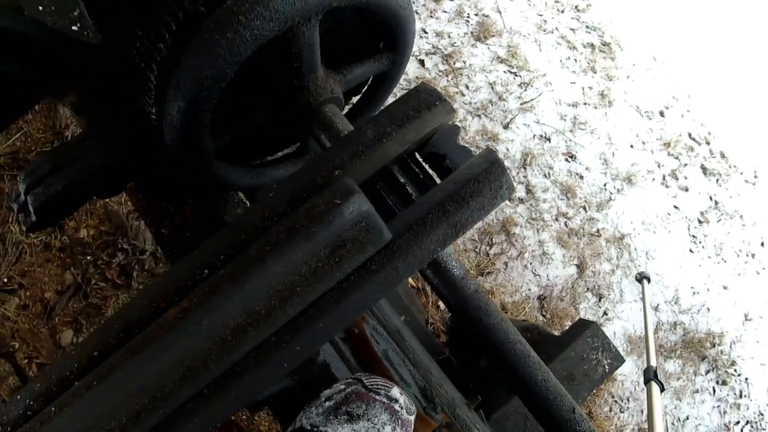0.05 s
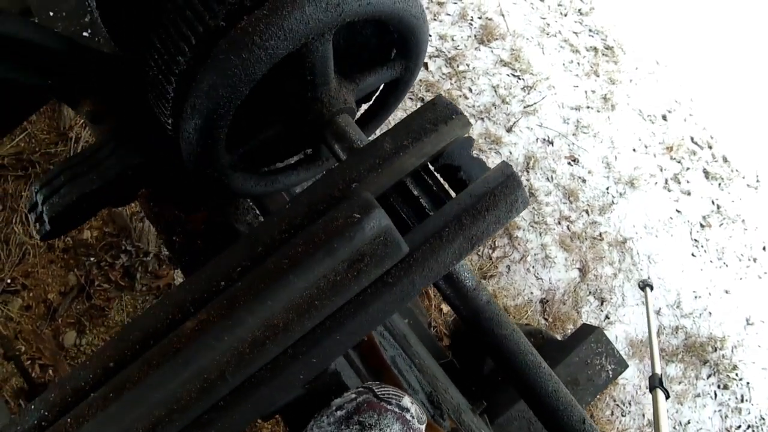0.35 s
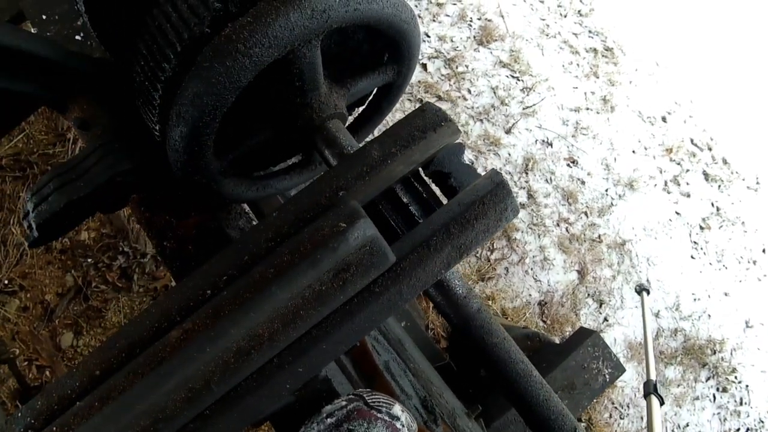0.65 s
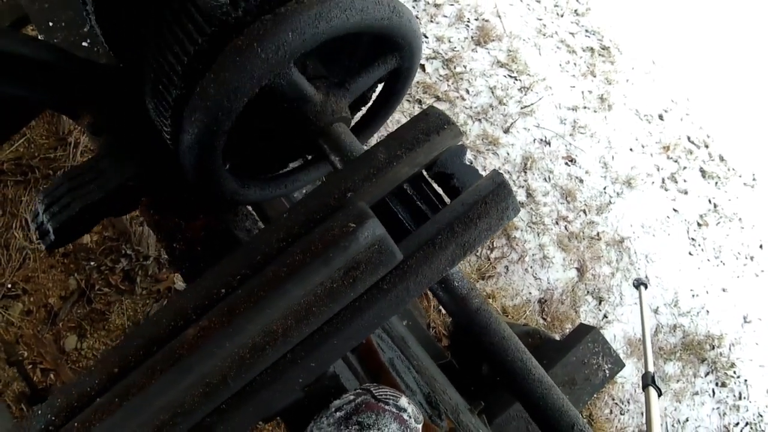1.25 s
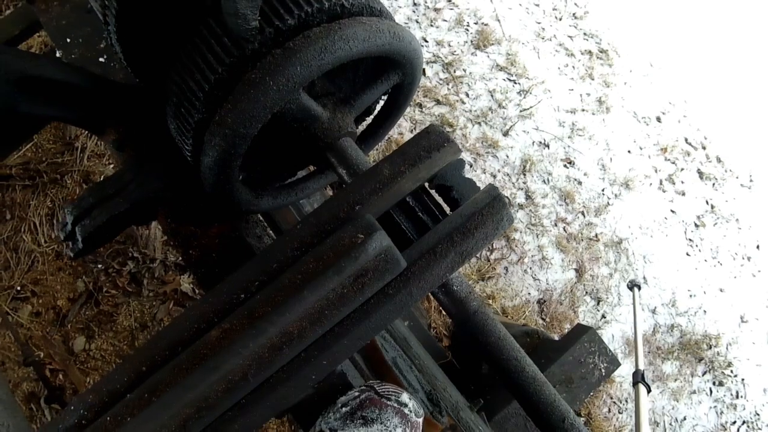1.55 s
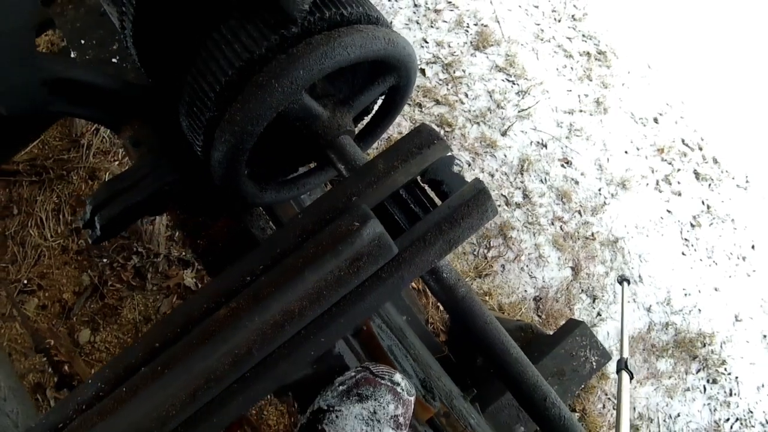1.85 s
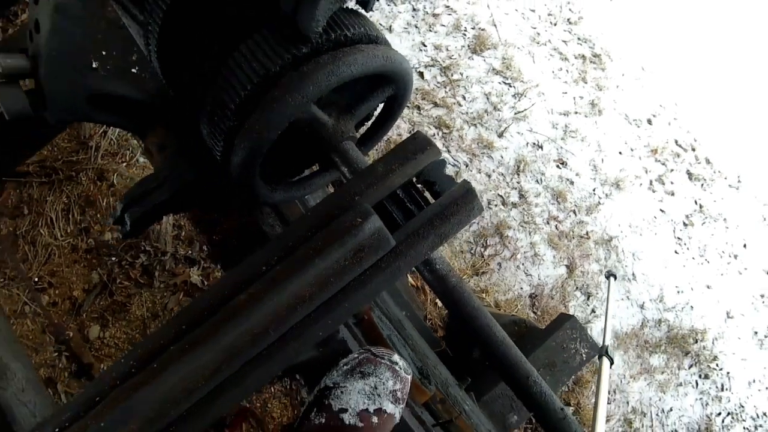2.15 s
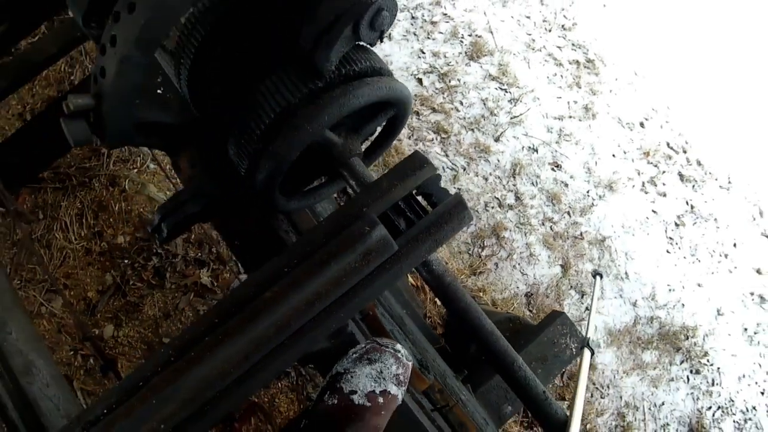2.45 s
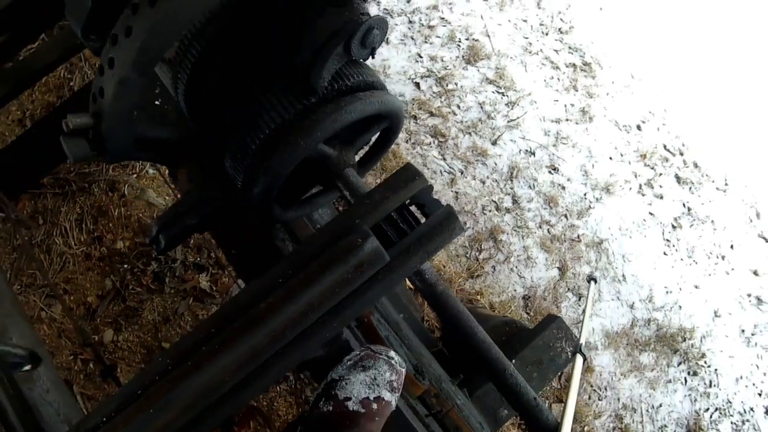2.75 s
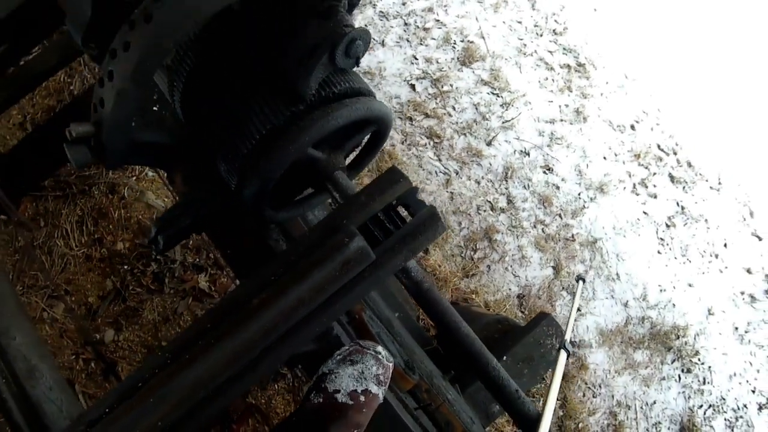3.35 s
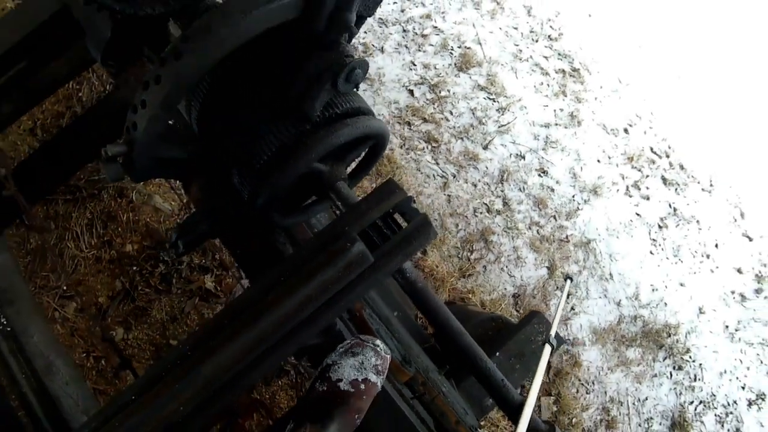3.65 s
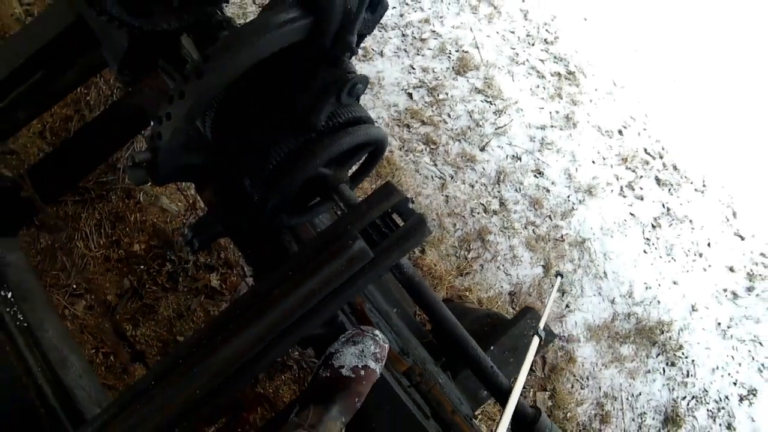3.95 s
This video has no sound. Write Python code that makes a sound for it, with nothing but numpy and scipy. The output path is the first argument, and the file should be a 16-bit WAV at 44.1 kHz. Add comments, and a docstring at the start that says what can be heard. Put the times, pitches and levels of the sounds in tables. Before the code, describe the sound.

Loose iron gearing clatters and lightly scrapes close by as a handwheel turns. Bright clinks cluster around 0.5 seconds, ending in a dull knock at 0.8. The clatter returns from 1 to 1.4 seconds, with more clinks near 1.75 and a knock at 2. After a lull, a faint rustle leads to two snaps around 3.6 seconds. A low rumble throbs softly throughout, in an open shed.

```python
"""An iron handwheel on an old sawmill carriage is worked back and forth, close by in an open shed,
over a low, throbbing rumble. First its loose gearing clatters and scrapes; on the way back an iron bar
clinks, with a short, bright ring from the gear, and the travel ends in a dull knock. The cycle is heard
a second time. After a lull come a soft rustle and two snaps, as of a catch. Each impact is a brief burst
of noise, and the struck parts ring on in their own damped modes."""
import sys
import numpy as np
from scipy import signal
from scipy.fft import rfft, irfft
from scipy.io import wavfile
from scipy.ndimage import uniform_filter1d

SR = 44100
rng = np.random.default_rng(int(sys.argv[2]) if len(sys.argv) > 2 else 0)


def transcribe(u):
    """Save the signal u as a 16-bit wav file named by the first command-line argument.

    u: samples, shape (n,) or (channels, n), limited to [-1, 1]; the rate is SR.
    q: integer samples, one column per channel.
    """
    v = np.clip(np.atleast_2d(u).T, -1, 1)
    q = np.round(v * 32767).astype(np.int16)
    wavfile.write(sys.argv[1], SR, q)


N = 176400
ATTACK_S, CONTACT_DB = .0004, -3  # rise time of an impact; gain of the gear and bar impacts

# Spectrum of iron striking iron. Each row: frequency in Hz, gain in dB.
IRON_SPECTRUM = [(100, -22.5), (250, -13), (420, -2), (750, -6), (1400, 2.5), (2100, -1.5), (2950, 0.5),
                 (4000, 2), (6200, 3), (7200, -0.5), (8200, 2), (9900, -7.5), (11000, -5.5), (13300, -10),
                 (16000, -12.5)]
# Spectrum of the ticks, the catch and the grit. Each row: frequency in Hz, gain in dB.
DRY_SPECTRUM = [(150, -3.5), (600, -4), (1300, -8), (2600, -6), (4300, 0.5), (5500, -3.5), (8500, -7),
                (11000, -14), (13000, -8), (16000, -23)]


def undb(db):
    """Amplitude grows tenfold for every 20 dB."""
    return 10 ** (np.asarray(db) / 20)


def level(x, db):
    """Scaling sets the rms level in dB."""
    return x * undb(db) / np.sqrt(np.mean(x ** 2))


def fade(t, t60):
    """Exponential damping loses 60 dB in t60 seconds."""
    return np.exp(-np.log(1000) * t / t60)


def add(out, at, x):
    """Superposition: a sound adds to the mix from a start in seconds."""
    i = max(int(round(at * SR)), 0)
    out[i:i + len(x)] += x[:N - i]


def curve(points, size):
    """Interpolation in log frequency gives a gain in dB for each spectral bin."""
    hz, db = np.array(points, float).T
    return np.interp(np.log(np.maximum(np.fft.rfftfreq(size, 1 / SR), 1)), np.log(hz), db)


def colour(x, db):
    """A minimum-phase filter applies the gain in each bin causally."""
    cepstrum = irfft(np.log(undb(db)), len(x))
    cepstrum[1:len(x) // 2] *= 2
    cepstrum[len(x) // 2 + 1:] = 0
    return irfft(rfft(x) * np.exp(rfft(cepstrum)), len(x))


def passband(x, order, hz, kind="band"):
    """A maximally flat filter attenuates what lies outside its band."""
    return signal.sosfilt(signal.butter(order, hz, kind, fs=SR, output="sos"), x)


def grains(per_s, spread_db):
    """Shot noise: impulses of uneven size arrive at random."""
    return (rng.random(N) < per_s / SR) * rng.standard_normal(N) * undb(spread_db * rng.standard_normal(N))


def ring(modes, scatter_db, detune=.001):
    """Free vibration is a sum of damped modes; each blow shares out the energy and detunes them anew."""
    t = np.arange(SR // 2) / SR
    chance = rng.standard_normal((len(modes), 2))
    waves = sum(undb(db + scatter_db * share) * fade(t, t60)
                * np.sin(2 * np.pi * hz * (1 + detune * shift) * t)
                for (hz, db, t60), (share, shift) in zip(modes, chance))
    return waves * (1 - np.exp(-t / ATTACK_S))


def partials(t, count=16, low_hz=1800, high_hz=8940, t60=.028):
    """Damping rises with frequency: of these brief iron resonances, the higher die sooner."""
    place = (np.arange(count) + rng.random(count)) / count
    hz = (low_hz + (high_hz - low_hz) * place)[:, None]
    waves = np.sin(2 * np.pi * hz * t) * fade(t, t60 * np.sqrt(np.mean(hz) / hz))
    return rng.standard_normal(count) @ waves / np.sqrt(count)


def contact(spectrum, body_db, treble_db, t60, tail_db, tail_t60, partials_db=-9, size=4096):
    """A short impact excites a wide band: a crack, dying bounces, brief partials and a dense ring.
    Body is the gain below 2.2 kHz, treble the gain above 8.5 kHz."""
    t, hz = np.arange(size) / SR, np.fft.rfftfreq(size, 1 / SR)
    onset = lambda s: 1 - np.exp(-s / ATTACK_S)
    envelope = onset(t) * fade(t, t60)
    tail = passband(rng.standard_normal(size), 1, 8000, "low") * undb(tail_db) * fade(t, tail_t60)
    noise = rng.standard_normal(size)
    roughness = np.repeat(undb(3 * rng.standard_normal(size // 16)), 16)
    crack = level(noise * roughness, 0)
    bounce_db, loss_db, gap_s = -19, 3, .006
    for k, lag in enumerate(np.cumsum(gap_s * (.5 + rng.random(size=3)))):
        since = np.maximum(t - lag, 0)
        envelope = envelope + undb(bounce_db - k * loss_db) * onset(since) * fade(since, t60)
    # Each point of impact favours other resonances: about 2 dB of scatter every 480 Hz.
    point_db = 2 * np.interp(hz / 480, np.arange(128), rng.standard_normal(128))
    burst = colour(envelope * crack + onset(t) * (tail + undb(partials_db) * partials(t)), point_db)
    attack = irfft(rfft(burst) * ((hz > 2000) & (hz < 7000)))[t < .005]
    hardness = [(2200, body_db), (3200, 0), (6600, 0), (8500, treble_db)]
    return colour(burst / np.std(attack), curve(spectrum, size) + curve(hardness, size))


def background():
    """Amplitude modulation makes a low rumble throb beneath a faint hiss and a thin whine."""
    # Noise of still air and hiss. Each row: frequency in Hz, relative spectral density in dB.
    air_spectrum = [(12, -5), (25, 0), (55, -13.5), (88, -18), (200, -28.5), (540, -41), (1150, -50.5),
                    (3000, -55.5), (10000, -57.5), (15000, -56.5)]
    # Low tones that swell with the throb. Each row: frequency in Hz, level at mid-swell in dB.
    hum = [(40, -58), (60, -62.5)]
    # Faint steady tones. Each row: frequency in Hz, level in dB.
    whine = [(10420, -87), (15000, -81.5)]
    first_s, period_s, width_s, swell_db, pulse_db = .195, .2652, .035, 10, -30
    t, hz = np.arange(N) / SR, np.fft.rfftfreq(N, 1 / SR)
    tones = lambda lines: sum(level(np.sin(2 * np.pi * (f * t + rng.random())), db) for f, db in lines)
    from_bump = (t - first_s + period_s / 2) % period_s - period_s / 2
    bump = np.exp(-(from_bump / width_s) ** 2)
    air = level(irfft(rfft(rng.standard_normal(N)) * undb(curve(air_spectrum, N)), N), db=-48.5)
    low = irfft(rfft(air) / (1 + (hz / 100) ** 4), N)
    rumble = (low + tones(hum)) * undb(swell_db * (bump - .5)) + undb(pulse_db) * (bump - bump.mean())
    return rumble + air - low + tones(whine)


def shed(x, t60=.37, build_s=.016, gain_db=-21):
    """Reverberation: reflections from the roof and machinery merge into a weak, diffuse tail."""
    # Spectrum of the reflections. Each row: frequency in Hz, relative gain in dB.
    spectrum = [(100, 1.5), (700, 2), (2000, -3.5), (9000, -10.5), (16000, -8.5)]
    t = np.arange(SR) / SR
    reflections = rng.standard_normal(SR) * fade(t, t60) * (1 - np.exp(-t / build_s))
    tail = colour(reflections, curve(spectrum, SR))
    return signal.fftconvolve(x, tail / np.sqrt(np.sum(tail ** 2)))[:N] * undb(gain_db)


def rustle():
    """Dense shot noise blends into a soft, airy rustle that leads into the snaps."""
    # Envelope of the rustle. Each row: time in seconds, level in dB.
    swell = [(3.2, -96), (3.28, -73.5), (3.6, -70.5), (3.9, -76)]
    at, db = np.array(swell).T
    hiss = passband(grains(per_s=6000, spread_db=3), 1, [500, 8000])
    return level(hiss, 0) * undb(np.interp(np.arange(N) / SR, at, db))


def ticks(gain_db=9.5):
    """Heavily damped impacts give small, dry ticks as the parts settle."""
    # Light contacts. Each row: start in seconds, then relative level, body and treble in dB.
    touches = [(0.609, -47, 0, -6), (1.181, -62, 7, 4), (2.054, -52, 7.5, -6), (3.4789, -87.5, 33, 0),
               (3.614, -53.5, 8.5, 4), (3.6335, -63.5, 17.5, 15), (3.809, -64, 1.5, -14)]
    out = np.zeros(N)
    for at, db, body, treble in touches:
        tick = contact(DRY_SPECTRUM, body, treble, t60=.0056, tail_db=-22.5, tail_t60=.034,
                       partials_db=-25)
        add(out, at, undb(db + gain_db) * tick)
    return out


def catch():
    """Two impulses snap, as of a catch, each with a hissing tail; the first excites more ringing."""
    # A catch lifts and drops. Each row: start in seconds, then relative level, body, treble, ring in dB.
    snaps = [(3.5937, -34.5, 0, -6, -20), (3.6534, -32.5, -4, 5, -33)]
    # Modes of the catch. Each row: frequency in Hz, relative level in dB, t60 in seconds.
    modes = [(1040, -32, 0.16), (1340, -26, 0.093), (3780, -21.5, 0.11), (4130, -10, 0.012),
             (5330, 2.5, 0.0098)]
    out = np.zeros(N)
    for at, db, body, treble, ring_db in snaps:
        snap = contact(DRY_SPECTRUM, body, treble, t60=.013, tail_db=-22, tail_t60=.2,
                       partials_db=-19, size=16384)
        add(out, at, undb(db) * snap)
        add(out, at, undb(ring_db) * ring(modes, scatter_db=1))
    return out


def dragging(gear, bar):
    """Friction: a rough, low scrape follows the gearing, and fine grit crackles around each blow."""
    smooth = lambda x, s: uniform_filter1d(x, int(s * SR))
    effort = lambda x, s: np.abs(smooth(smooth(np.abs(x), s), s))
    # Spectrum of the scrape. Each row: frequency in Hz, relative gain in dB.
    spectrum = [(90, -14), (340, 3.5), (560, 4), (750, -2), (1400, -14), (3000, -18.5)]
    scrape = colour(grains(per_s=500, spread_db=3) * effort(gear, .07) ** .7, curve(spectrum, N))
    grit = colour(grains(per_s=500, spread_db=5) * effort(gear + bar, .012), curve(DRY_SPECTRUM, N))
    return level(scrape, db=-60.5) + level(grit, db=-67)


def knocks():
    """Low, quickly damped modes give a dull, hollow knock as the mechanism meets its stop."""
    # Blows on the stop. Each row: start in seconds, relative level in dB.
    blows = [(0.55, -41.5), (0.7954, -34.5), (2.0101, -31)]
    # Modes of the stop. Each row: frequency in Hz, relative level in dB, t60 in seconds.
    modes = [(402.3, -8, 0.1), (531, -2.5, .06), (570, 1.5, 0.067), (684, -10, 0.051), (955, -8.5, .05),
             (1165, -7.5, 0.054), (1340, -8, .025), (1748, -11.5, .03)]
    out, t = np.zeros(N), np.arange(SR // 10) / SR
    for at, db in blows:
        thud = passband(rng.standard_normal(len(t)), 3, [380, 1400])
        add(out, at, undb(db) * ring(modes, scatter_db=2.5))
        add(out, at, level(thud, db - 1.5) * fade(t, t60=.05))
    return out


def clinks():
    """The struck bar vibrates freely and the gear rings briefly; later blows and the stop damp both."""
    # Blows on the ringing parts. Each row: start in seconds, then relative level, body, treble,
    # ring of the bar and ring of the gear in dB.
    blows = [(0.4658, -35, 2, -9, -53, -37), (0.4792, -34, 1.5, -6, -28.5, -50),
             (0.5073, -37.5, 10, 3, -49, -51.5), (0.5234, -27, -2.5, 3.5, -38.5, -32.5),
             (0.5304, -22, -7, -5.5, -39, -39.5), (0.539, -20.5, 0.5, -4, -33, -33.5),
             (0.5408, -16.5, -2.5, -2.5, -29, -34), (0.5725, -31.5, -1.5, 6, -38.5, -32.5),
             (0.5865, -26, -2, -8.5, -30.5, -40.5), (0.6449, -26, -2.5, 0.5, -34.5, -23),
             (0.662, -38, 8, -18.5, -43, -49), (0.7447, -33, 4, 0, -81, -42.5),
             (0.7603, -44.5, 6.5, -24.5, -43, -59.5), (1.637, -37.5, 6, -2.5, -52, -35),
             (1.684, -50.5, 3.5, 5, -32.5, -50), (1.717, -27, -4, -3.5, -47.5, -24),
             (1.747, -37.5, -2.5, -1, -27, -41), (1.756, -20.5, -6, 6, -30.5, -35),
             (1.7709, -37.5, 3.5, -5, -38, -44.5), (1.7778, -27, -4.5, -3, -45, -27),
             (1.8042, -37, 4.5, -1, -35, -37), (1.8276, -38.5, 4, -1.5, -76.5, -44),
             (1.8634, -31, -1.5, -0.5, -25.5, -81), (1.8944, -37.5, 4.5, 0.5, -42.5, -42),
             (1.9973, -36.5, 2, -2, -59, -57.5)]
    # Modes of the iron bar. Each row: frequency in Hz, relative level in dB, t60 in seconds.
    bar_modes = [(835, -17, .8), (2049, -1.5, .34), (3686, -8, .12), (4135, -7, .05), (4385, 1, .075),
                 (4720, -9, .04), (5565, -11, .07), (5967, -11, .08), (7690, -14, .08)]
    # The gear's short, bright ring. Each row: frequency in Hz, relative level in dB, t60 in seconds.
    gear_ring_modes = [(847, -20, .2), (2087, -2.5, 0.059), (2550, -2.5, .047), (4640, -9.5, 0.019),
                       (5700, -9.5, .022), (9020, -7, .022)]
    stops_s, choke_db = (.82, 2.01), -1  # when the stop presses on the bar; gain per later blow
    out, t = np.zeros(N), np.arange(SR // 2) / SR
    for at, db, body, treble, bar_db, gear_ring_db in blows:
        bar = undb(bar_db) * ring(bar_modes, scatter_db=2.5)
        gear_ring = undb(gear_ring_db) * ring(gear_ring_modes, scatter_db=4.5)
        crack = contact(IRON_SPECTRUM, body, treble, t60=.008, tail_db=-19.5, tail_t60=.085)
        free_s = min([stop - at for stop in stops_s if stop > at], default=1)
        later_blows = sum(at + t > start for start, *_ in blows if start > at)
        damping = undb(choke_db * later_blows) * fade(np.maximum(t - free_s, 0), t60=.15)
        add(out, at, undb(db + CONTACT_DB) * crack)
        add(out, at, (bar + gear_ring) * damping)
    return out


def gearing():
    """Backlash lets loose parts collide, exciting the gear's modes and the dense ring of the frame."""
    # Collisions. Each row: start in seconds, then relative level, body, treble and gear ring in dB.
    collisions = [(0.0005, -39.5, 8, 4, -39), (0.025, -31.5, 7, -1, -41), (0.0393, -37.5, 8.5, -1, -44),
                  (0.049, -36, 9, 0.5, -42.5), (0.0954, -33.5, 8, -4, -38), (0.1007, -22, -1, -4, -44),
                  (0.1195, -34, 3.5, -3.5, -34), (0.1574, -29, -4, -5, -42), (0.1624, -29, -1, -3.5, -48.5),
                  (0.1685, -31, 1.5, -6.5, -56), (0.1748, -31, -2, -4.5, -58.5),
                  (0.24, -32.5, -2, 1, -61.5), (0.3315, -43, 6, -1.5, -60), (0.3365, -41, 7, -1.5, -57),
                  (0.3944, -37.5, 5.5, -11, -49.5), (0.9185, -43.5, 2.5, -2.5, -73),
                  (0.998, -35.5, 11, -6.5, -52.5), (1.0585, -27.5, 2.5, 2.5, -42),
                  (1.0659, -39, 14.5, -6, -46), (1.0916, -34, 7, -2.5, -43.5),
                  (1.1376, -25.5, 2.5, -2.5, -38), (1.1443, -28.5, 0.5, -0.5, -46),
                  (1.148, -33, -2, 5, -47.5), (1.1627, -33.5, 0.5, -12.5, -44),
                  (1.1985, -29.5, 3.5, -5, -43.5), (1.2027, -28.5, 4.5, -9, -43.5),
                  (1.2196, -35.5, 4, -2.5, -60), (1.2243, -35.5, 6, -8, -50.5), (1.2611, -27, 4, -3.5, -35),
                  (1.2675, -26.5, 9, -3, -37.5), (1.2772, -34, 8.5, -10.5, -54.5),
                  (1.3187, -42.5, 14.5, -3, -32.5), (1.3315, -43, 12, -4.5, -47),
                  (1.3463, -36, -2.5, 3.5, -35), (1.3513, -35.5, 7.5, -3.5, -48),
                  (1.4105, -38.5, 6, -11, -58.5), (1.4446, -59, 22, -7, -86), (1.487, -58.5, 11, -5.5, -77),
                  (1.6005, -41, 2, -18.5, -50), (2.0691, -35.5, 2.5, 2, -56), (2.0765, -34, 2, -12, -60),
                  (2.0825, -41, 4, 6, -56.5), (2.1437, -41.5, 3, -24, -69),
                  (2.1864, -47, 7.5, -11.5, -76.5)]
    # Modes of the gear. Each row: frequency in Hz, relative level in dB, t60 in seconds.
    modes = [(877, -12, .16), (1330, -9, .1), (1480, -3.5, .08), (2096, -3, .2), (2385, -10.5, .07),
             (2450, -2.5, .1), (3640, -8.5, .08), (3862, -10.5, .07), (5060, -10, .06), (5505, -9.5, 0.052),
             (6030, -9.5, .06), (7900, -13.5, 0.063)]
    out = np.zeros(N)
    for at, db, body, treble, ring_db in collisions:
        crack = contact(IRON_SPECTRUM, body, treble, t60=.011, tail_db=-19, tail_t60=.07)
        add(out, at, undb(db + CONTACT_DB) * crack)
        add(out, at, undb(ring_db + 1) * ring(modes, scatter_db=2))
    return out


def scene():
    """The direct sound of the iron superposes with its reverberation, the rustle and the background."""
    gear, bar = gearing(), clinks()
    iron = gear + bar + dragging(gear, bar) + knocks() + ticks() + catch()
    return (iron + shed(iron) + rustle() + background())[None]


def record(dry):
    """Soft saturation rounds the highest peaks, and a steep low-pass filter cuts the top."""
    ceiling, top_hz = .5, 15800
    rounded = ceiling * np.tanh(dry / ceiling)
    return signal.sosfilt(signal.ellip(10, .2, 70, top_hz, fs=SR, output="sos"), rounded)


dry = scene()
out = record(dry)
transcribe(out)
```